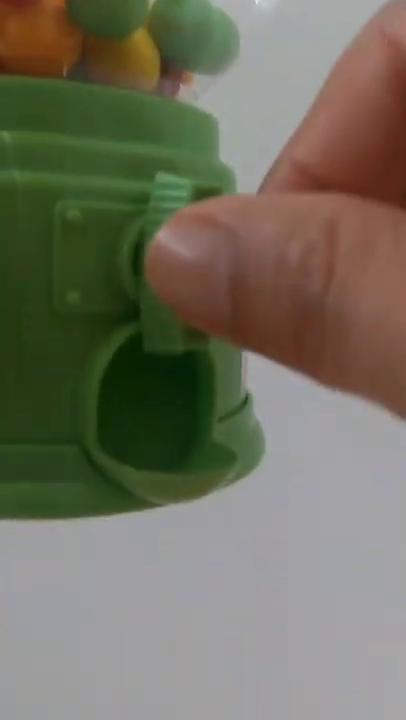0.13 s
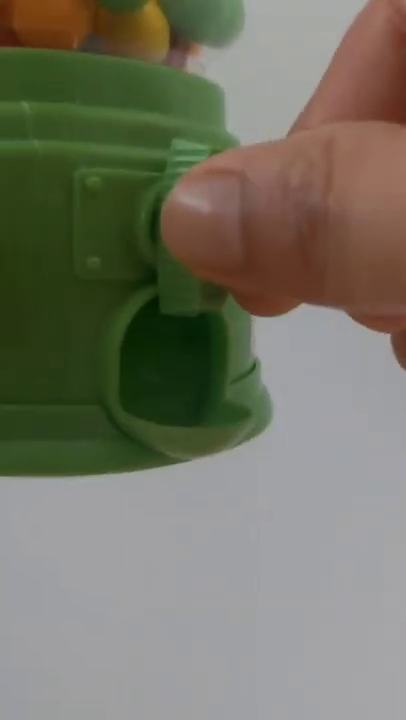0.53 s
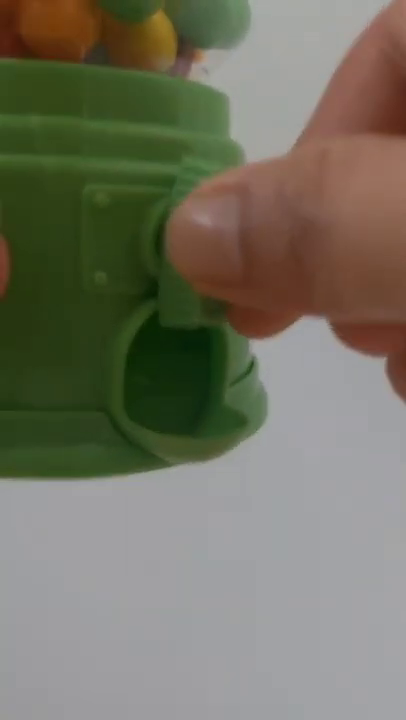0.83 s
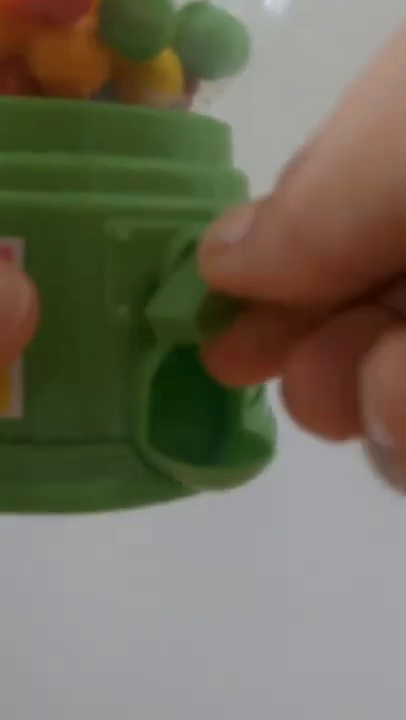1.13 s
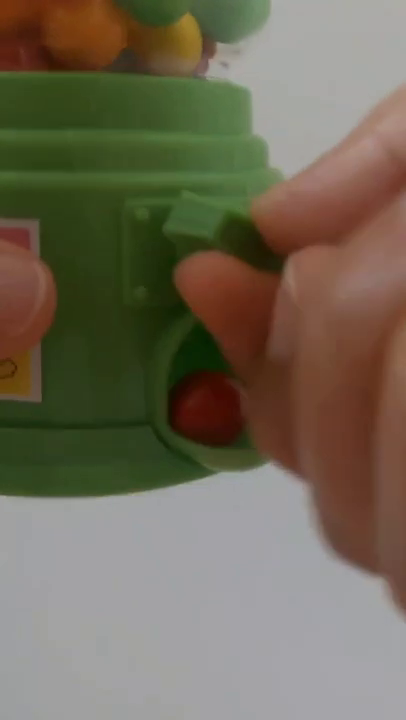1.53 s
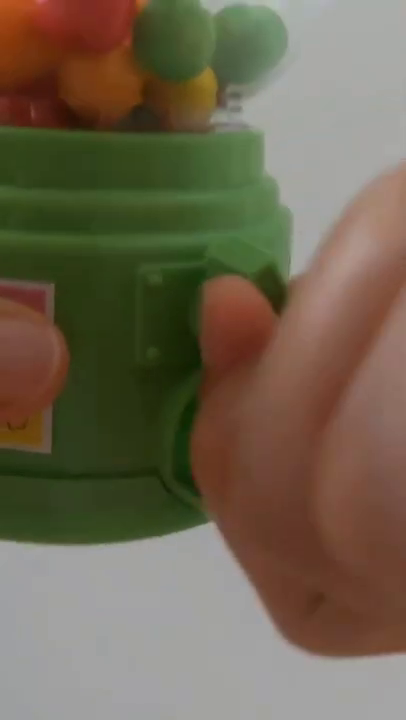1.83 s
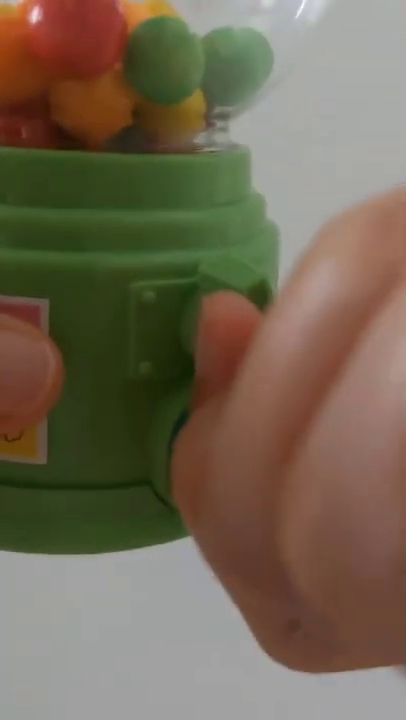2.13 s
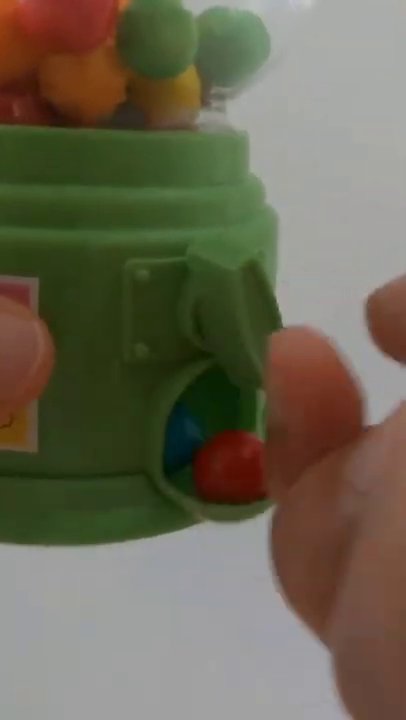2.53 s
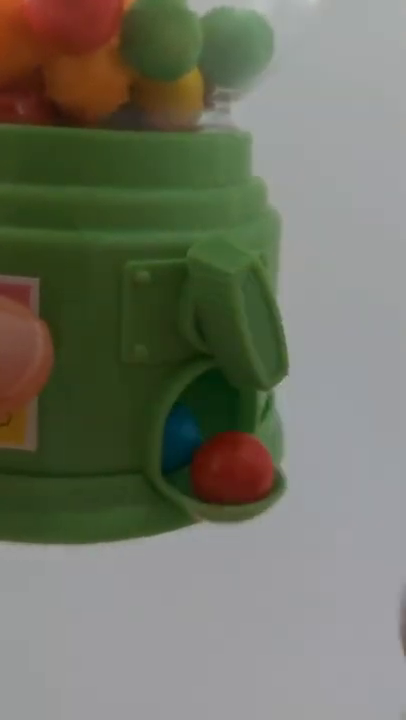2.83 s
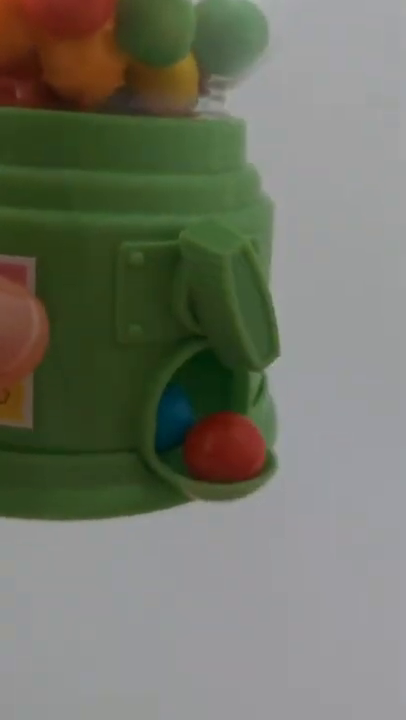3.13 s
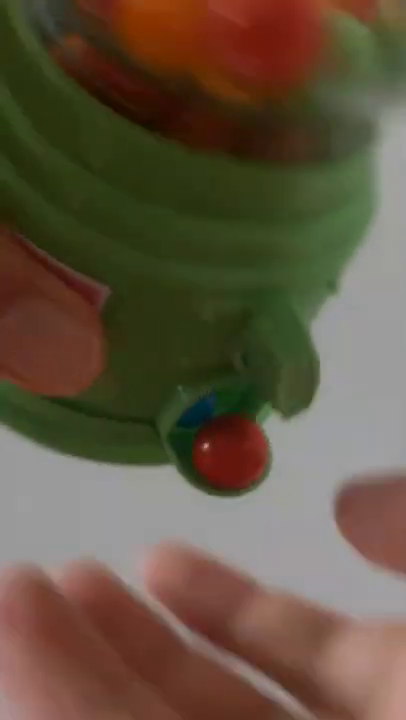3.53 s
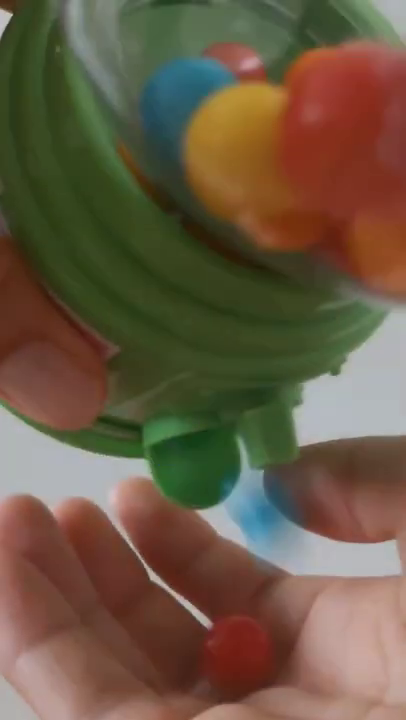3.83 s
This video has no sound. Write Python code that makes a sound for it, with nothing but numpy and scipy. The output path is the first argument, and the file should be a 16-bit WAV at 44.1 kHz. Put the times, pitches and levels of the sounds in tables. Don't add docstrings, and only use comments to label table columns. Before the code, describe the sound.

A plastic ratchet crank snaps as gumballs clatter down, followed by a dense rattle at the end

```python
import sys
import numpy as np
from scipy import signal
from scipy.fft import rfft, irfft
from scipy.io import wavfile
from scipy.ndimage import uniform_filter1d

SR = 44100
rng = np.random.default_rng(int(sys.argv[2]) if len(sys.argv) > 2 else 0)


def amp(db):
    return 10 ** (np.asarray(db, float) / 20)


def write(x):
    x = np.atleast_2d(x).T
    wavfile.write(sys.argv[1], SR, np.round(np.clip(x, -1, 1) * 32767).astype(np.int16))


N = 176400

# t/s, peak level/dB, thump level/dB, thump left-right/dB
SNAPS = [
    (1.342, -6, -27.5, -38),
    (1.493, -5, -37.5, -19),
    (1.709, -6, -30.5, 18.5),
    (1.945, -6.5, -31.5, 13),
]
# f/Hz, level/dB
BASE_COLOUR = [(250, -29.5), (660, -24), (840, 0), (1240, -4.5), (3000, -9.5), (6000, -12.5), (11000, -20),
               (14600, -28)]
# f/Hz, level/dB
GLOBE_COLOUR = [(88, -35), (150, -5), (661, -10.5), (835, -5), (1030, -3), (2970, 10.5), (12300, -8.5),
                (14400, -21), (15900, -71)]
RISE_S, CHATTER_S = 0.0004, 0.003


def evened(x):
    return x / np.sqrt(np.mean(x ** 2) + 1e-20)


def read(points, hz):
    f, value = np.transpose(points)
    return np.interp(np.log(hz + 1), np.log(f + 1), value)


def add(mix, s, sound):
    part = mix[:, round(s * SR):][:, :sound.shape[1]]
    part += sound[:, :part.shape[1]]


def rings(hz, db, t60, phase, size=4000):
    t = np.arange(size)[:, None] / SR
    modes = amp(db - 60 * t / t60) * np.sin(2 * np.pi * hz * t + phase)
    return modes.sum(1)


def causal(x, db):
    fold, half = irfft(np.log(amp(db))), x.shape[1] // 2
    fold[:, 1:half] *= 2
    fold[:, half + 1:] = 0
    return irfft(rfft(x) * np.exp(rfft(fold)))


def shell(colour, hollow_db, bright_db, chatter_s, rise_s=RISE_S, size=8192):
    # f/Hz, level/dB, t60/s
    cavity_modes = [(215, -18, 0.04), (296, -19, 0.063), (864, 3, 0.051), (957, -3, .03),
                    (1078, 1.5, 0.022), (1457, 2.5, 0.031), (1993, -5, 0.09)]
    # f/Hz, left-right level/dB
    port_balance = [(60, 0.0), (180, -0.5), (550, -1.5), (1650, 3), (4970, 1), (15000, -1)]
    crack_t60, ring_t60, ring_db, flutter_db, ragged_db = 0.019, 0.08, -12.5, 3, 3
    room_t60, room_db, room_dull_db = 0.49, -18, -0.5
    shared, right_lag_s = 0.059, 0.0002
    t, hz = np.arange(size) / SR, np.fft.rfftfreq(size, 1 / SR)
    a, b, c, d, bumps, tick = rng.standard_normal((size, 6)).T

    struck = rng.random(size) < 0.04
    ticks = (0.42 * abs(tick) * struck * np.exp(-(t / chatter_s) ** 2))[:600]
    ticks[0] = 2
    crack_power = signal.fftconvolve(ticks ** 2, amp(-120 * t / crack_t60))[:size]
    flutter = flutter_db * evened(uniform_filter1d(tick, size=90))
    shake = np.sqrt(abs(crack_power)) + amp(ring_db - 60 * t / ring_t60 + flutter)
    shake *= 1 - np.exp(-t / rise_s)

    ragged = evened(uniform_filter1d(uniform_filter1d(bumps[:len(hz)], size=60), size=40))
    octaves = np.log2(np.maximum(hz, 900) / 3000)
    balance = read(port_balance, hz) * np.array([[0.5], [-0.5]])
    db = read(colour, hz) + bright_db * octaves / 2 + balance
    right = shared * a + np.sqrt(1 - shared ** 2) * b
    walls = causal(np.array([a, right]) * shake, db + ragged_db * ragged)

    echo = amp(room_db - 60 * t / room_t60) * (1 - np.exp(-t / 0.002))
    echo *= np.hanning(2 * size)[size:]
    tail = causal(np.array([c, d]) * echo, db + room_dull_db * octaves)

    f, level, ring = np.transpose(cavity_modes)
    vary = rng.random((len(f), 2)) - 0.5
    group_db = np.where(abs(f - 900) < 100, *hollow_db)
    cavity = rings(f * (1 + 0.06 * vary[:, 0]), level + group_db + 9 * vary[:, 1], ring, 0, size=3000)
    swell = np.sin(np.pi / 2 * np.minimum(t[:3000] / max(0.0028, rise_s), 1)) ** 2

    both = (walls + tail) / abs(walls).max()
    both[:, :3000] += cavity * swell * amp([[1.5], [-1.5]])
    lag = round(right_lag_s * SR)
    return np.array([np.pad(both[0], (0, lag)), np.pad(both[1], (lag, 0))])


def knocks(rows, colour, chatter_s, rise_s=RISE_S):
    out = np.zeros((2, N))
    for s, db, low_db, bright_db, upper_db in rows:
        sound = shell(colour, (low_db, upper_db), bright_db, chatter_s, rise_s)
        add(out, s, amp(db) * sound / abs(sound.mean(0)).max())
    return out


def ratchet():
    # f/Hz, level/dB
    snap_colour = [(400, -14.5), (905, -1), (1630, -7.5), (1930, 1.5), (4780, -1.5), (6710, 8),
                   (11000, -3.5), (14600, 1)]
    low_db, upper_db = -32, -24.5
    rows = [(s, db, low_db, 0.1, upper_db) for s, db, *_ in SNAPS]
    return knocks(rows, snap_colour, chatter_s=0.0007)


def thumps():
    thump_db, kick_db, kick_s = 16.5, -0.5, 0.00042
    out, t = np.zeros((2, N)), np.arange(4000) / SR
    u = t / kick_s
    kick = amp(kick_db) * u * np.exp(1 - u)
    push = rings(65, 0, 0.075, 0) - kick
    for s, _, db, pan_db in SNAPS:
        pan = np.minimum(amp([[pan_db], [-pan_db]]), 1)
        add(out, s + 0.0013, amp(db + thump_db) * push * pan)
    return out


def base_knocks():
    # t/s, peak level/dB, low cavity level/dB, brightness/dB, upper cavity level/dB
    base_hits = [(1.172, -5, -6.5, 7, -12.5), (1.229, -8.5, -10.5, 1.5, -21),
                 (1.253, -18.5, -20.5, 4.5, -12.5), (1.26, -14, -13.5, 1, -14),
                 (1.271, -18, -11.5, -2.5, -14.5), (1.283, -14, -21, -1, -20),
                 (1.302, -26, -11.5, 2, -15.5), (1.455, -15.5, -15, 1, -12), (1.505, -13, -13.5, 3.5, -9.5),
                 (1.597, -18.5, -23.5, -0.5, -14), (1.62, -16.5, -28, 0.5, -21),
                 (1.63, -24, -16.5, -2, -5.5), (1.656, -16, -23, 0.5, -10.5),
                 (1.666, -28, -21.5, 4.5, -3.5), (1.676, -31, -9, 5, -5), (2.064, -6.5, -19.5, 6.5, -13),
                 (2.12, -13, -26.5, -3, -14), (2.141, -17.5, -13.5, 2, -13), (2.15, -28.5, -19.5, 0, -4.5),
                 (2.17, -14, -26.5, 3, -9.5), (2.183, -22, -31.5, 4.5, -17), (2.197, -28, -32, -5.5, -15),
                 (2.204, -19, -27, -3.5, -8.5), (2.21, -10, -20, 3, -16.5),
                 (2.221, -22.5, -24, -0.5, -15.5), (2.238, -26.5, -17.5, 2.5, -9),
                 (2.249, -35, -25.5, 5, -9.5), (2.32, -24, -25, 0, -16), (2.356, -37, -15.5, -3.5, -10)]
    return knocks(base_hits, BASE_COLOUR, CHATTER_S)


def nudges():
    # t/s, peak level/dB, low cavity level/dB, brightness/dB, upper cavity level/dB
    soft_hits = [(1.078, -50.5, -12.5, -1, -13), (1.092, -44.5, -7.5, -5, -16.5), (1.127, -49, -0.5, -1, 0),
                 (1.377, -28, -10.5, 2.5, -16), (1.424, -27.5, -6, 4.5, -4.5), (1.463, -21.5, -13, -1, -14),
                 (1.471, -17.5, -25, -5, -12.5), (1.524, -23, -25, 4, -22.5),
                 (1.544, -23, -10.5, -1, -19.5), (1.552, -26, -12.5, -3.5, -17.5),
                 (1.564, -33, -10, 1, -5.5), (1.732, -24, -26.5, 0, -16.5), (1.776, -29.5, -9, -5, -14.5),
                 (1.823, -30.5, -21, 2, -16.5), (1.856, -35.5, -6, -5.5, -3), (1.911, -47, 6.5, 0.5, 10.5),
                 (1.994, -30.5, -19, 5, -19.5), (2.034, -40.5, 15, -2, 14.5), (2.375, -61, -15, -12, -14),
                 (2.397, -57, -6, -8, -8), (2.452, -72, -16, 3, -12)]
    return knocks(soft_hits, BASE_COLOUR, 2 * CHATTER_S, rise_s=0.003)


def tumbles():
    # t/s, peak level/dB, low cavity level/dB, brightness/dB, upper cavity level/dB
    globe_hits = [(3.695, -34.5, -16, -12, -17), (3.707, -28.5, -21, -11, -31), (3.716, -22, -26, 0, -38),
                  (3.72, -13.5, -39, -11, -30), (3.726, -16, -29, 6, -30), (3.731, -7.5, -32, 4, -18),
                  (3.742, -13, -31, -13, -30), (3.752, -16, -23, 8, -13), (3.762, -10, -19, -5, -21),
                  (3.768, -6, -16, 0.5, -19), (3.78, -7.5, -34, 2, -27), (3.787, -19, -18, 5, -18),
                  (3.793, -14, -22, -7, -29), (3.799, -10, -38, -0.5, -21), (3.803, -7, -29, 8, -12.5),
                  (3.811, -11, -43, -3, -16), (3.818, -15, -30, 7, -23), (3.824, -25, -32, -8.5, -1),
                  (3.83, -15.5, -34, 0.1, -24), (3.844, -14, -5, -4, -6), (3.853, -15, -23, -9, -22),
                  (3.869, -15, -22, -15, -18), (3.878, -11, -39, -4.5, -28), (3.888, -13.5, -33, -3, -25),
                  (3.892, -14, -30, -10.5, -29), (3.911, -18, -23, 0.1, -13), (3.917, -4, -42, -1.5, -32),
                  (3.932, -8.5, -31, 5, -32), (3.937, -6, -51, 5.2, -19), (3.942, -29, -39, 4, -11),
                  (3.953, -26, -20, -9, -22), (3.964, -13.5, -34, -5.5, -20), (3.973, -18, -16.5, -1, -24),
                  (3.981, -21, -19, -8, -15)]
    return knocks(globe_hits, GLOBE_COLOUR, CHATTER_S)


def roll():
    # t/s, level/dB
    slide_level = [
        (3.66, -72),
        (3.701, -50.5),
        (3.729, -23.5),
        (3.798, -17),
        (3.842, -23.5),
        (3.9, -27),
        (3.946, -20.5),
        (4.0, -43),
    ]
    hits_per_s, spread_db, kinds = 900, 4.5, 10
    start = round(slide_level[0][0] * SR)
    size = N - start
    out = np.zeros((2, size))
    for _ in range(kinds):
        strength = amp(spread_db * np.minimum(rng.exponential(1, size), 4))
        hits = strength * (rng.random(size) < hits_per_s / kinds / SR)
        sound = shell(GLOBE_COLOUR, (-26, -23), bright_db=0.054, chatter_s=0.00039)
        out += signal.fftconvolve(sound, hits[None], axes=1)[:, :size]
    level = amp(np.interp((start + np.arange(size)) / SR, *np.transpose(slide_level)))
    return np.pad(evened(out) * level, ((0, 0), (start, 0)))


def rubs():
    # t/s, length/s, level/dB, centre f/Hz, width/Hz
    strokes = [(0.705, .055, -72, 2370, 5030), (1.079, 0.045, -61, 2540, 3050),
               (1.918, 0.012, -60, 1600, 2400), (1.932, .01, -54, 2200, 3000),
               (2.488, 0.09, -75, 2000, 260), (2.49, .11, -78, 5000, 7000), (2.493, .01, -78, 3350, 300),
               (2.58, 0.035, -76, 1900, 600), (2.512, 0.07, -82, 6600, 700), (2.53, .07, -83, 4400, 700),
               (2.43, .19, -78, 950, 600), (2.802, 0.023, -78, 6000, 6000)]
    out = np.zeros((2, N))
    for s, length, db, hz, width in strokes:
        size = round(length * SR)
        grit = rng.standard_normal((size, 3)).T
        f = np.fft.rfftfreq(size, 1 / SR)
        grains = grit[:2] * amp(2.9 * grit[2])
        band = irfft(rfft(grains) / (1 + (2 * (f - hz) / width) ** 2), size)
        add(out, s, amp(db) * evened(band) * np.sqrt(np.hanning(size)))
    return out


def floor():
    # f/Hz, level/dB
    air_colour = [(35, -31.5), (90, -10), (140, -14), (310, -21.5), (400, -37.5), (850, -36.5), (1300, -48),
                  (4000, -51), (14500, -60)]
    # t/s, level/dB
    floor_drift = [(0, 0.5), (1.0, 1.5), (2.499, -3), (3.201, -4.5), (4, 3.5)]
    # f/Hz, likeness (-1 to 1)
    likeness = [(60, 1), (240, 0.2), (950, 0.1), (3770, -0.83), (15000, 0.073)]
    air_db, hum_db, line_db = -58.5, -57, -50
    hum_hz, hum_width_hz, line_hz = 61, 5.4, 60.5
    frames, hz = N // 512 + 5, np.fft.rfftfreq(2048, 1 / SR)
    a, b, c, d = rng.standard_normal((frames, 1025, 4)).T
    same = np.clip(read(likeness, hz), -1, 1)[:, None]
    left = a + 1j * b
    right = same * left + np.sqrt(1 - same ** 2) * (c + 1j * d)
    z = np.array([left, right])

    def noise(spectra, gain):
        shaped = spectra * gain[:, None]
        return evened(signal.istft(shaped, nperseg=2048, noverlap=1536)[1][:, :N])

    air = noise(z, amp(read(air_colour, hz)))
    peak = 1 / (1 + ((hz - hum_hz) / hum_width_hz) ** 2) ** 2
    hum = noise(z[:, :, ::-1], peak)
    t = np.arange(N) / SR
    line = np.sin(2 * np.pi * line_hz * t)
    drift = amp(np.interp(t, *np.transpose(floor_drift)))
    return (amp(air_db) * air + amp(hum_db) * hum + amp(line_db) * line) * drift


def scene():
    crank = ratchet() + thumps()
    balls = base_knocks() + tumbles() + roll()
    return crank + balls + nudges() + rubs() + floor()


def top_cut(x):
    return signal.sosfilt(signal.butter(12, 16040, fs=SR, output="sos"), x)


def record(dry):
    knee, headroom = 0.7, 0.22
    edge_hz, above_edge_db, burst_db = 14700, -17, 13
    hz = np.fft.rfftfreq(N, 1 / SR)
    over = np.maximum(abs(dry) - knee, 0)
    dry = dry - np.sign(dry) * (over - headroom * np.tanh(over / headroom))
    top = irfft(rfft(dry) * np.clip((hz - edge_hz) / 200, 0, 1), N)
    kept = irfft(rfft(top) * np.clip((16100 - hz) / 900, 0, 1), N)
    power = (top ** 2).mean(0) + 1e-16
    sudden = uniform_filter1d(power, size=150) > amp(burst_db) * uniform_filter1d(power, size=1800)
    gate = uniform_filter1d(uniform_filter1d(sudden * 1.0, size=200), size=200)
    mix = dry - top + amp(above_edge_db) * gate * kept
    return top_cut(mix)


dry = scene()
out = record(dry)
write(out)
```